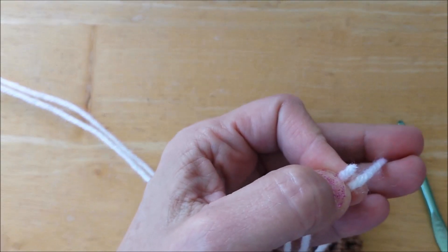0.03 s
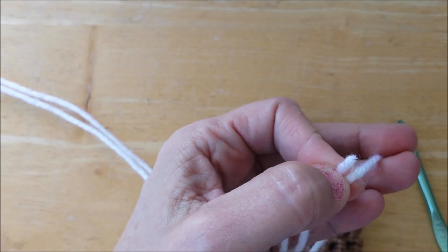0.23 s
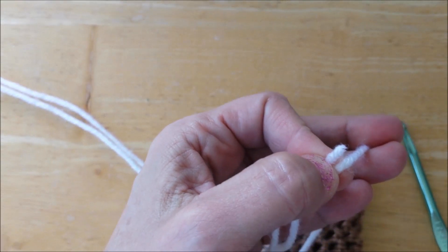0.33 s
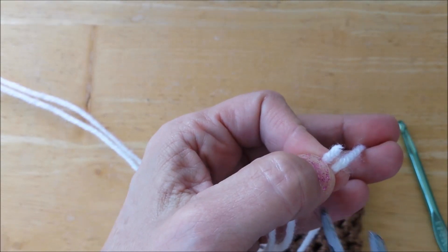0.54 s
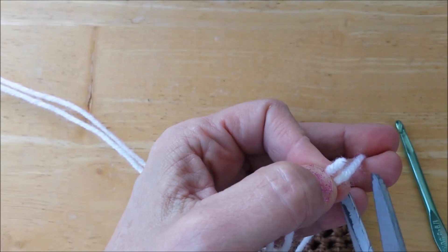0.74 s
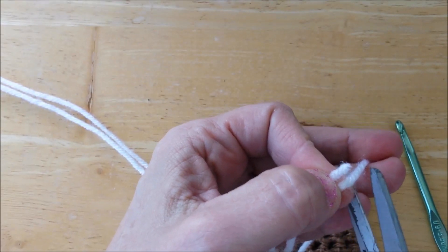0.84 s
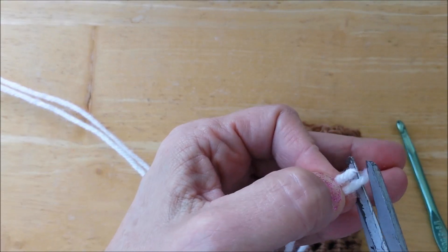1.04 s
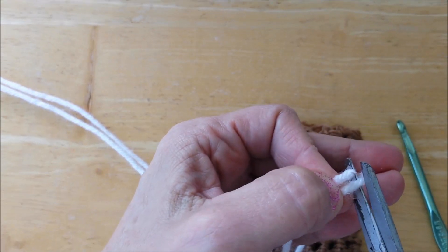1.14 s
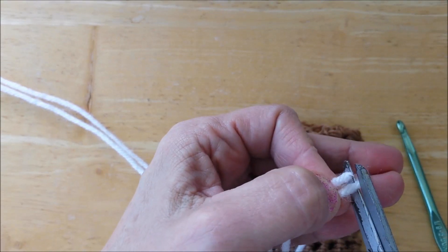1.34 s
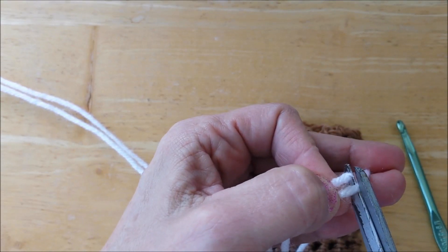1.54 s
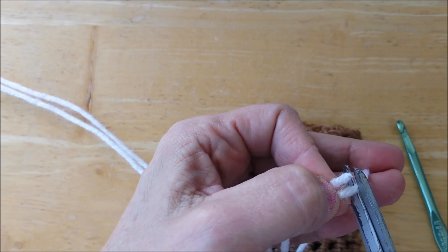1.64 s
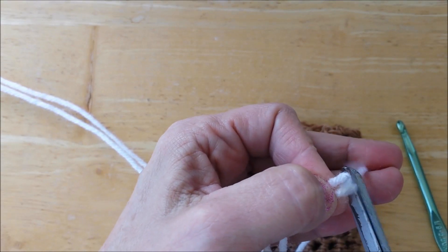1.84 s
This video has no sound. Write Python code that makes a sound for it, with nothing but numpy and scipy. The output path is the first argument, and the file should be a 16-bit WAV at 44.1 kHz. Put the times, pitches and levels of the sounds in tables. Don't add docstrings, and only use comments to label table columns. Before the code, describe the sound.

Scissors clack once against a wooden table near the start, then the blades tick and scrape open with a crisp metallic release; later only faint ticks and a soft snip, close stereo microphone in a small quiet room.

```python
import sys
import numpy as np
from scipy import signal
from scipy.fft import rfft, irfft
from scipy.io import wavfile
from scipy.ndimage import uniform_filter1d

SR = 44100
rng = np.random.default_rng(int(sys.argv[2]) if len(sys.argv) > 2 else 0)


def log_audio(samples):
    frames = np.atleast_2d(samples).T
    limited = np.clip(frames, -1, 1)
    pcm = np.round(limited * 32767).astype(np.int16)
    wavfile.write(sys.argv[1], SR, pcm)


def voltage_ratio(level):
    return 10 ** (np.asarray(level, float) / 20)


N = 83790
T = np.arange(N) / SR
F = np.maximum(np.arange(N // 2 + 1) * SR / N, 1)


def read(table, hz):
    table = np.array(table)
    return np.interp(np.log(hz), np.log(table[:, 0]), table[:, 1])


def unit(x):
    return x / np.sqrt(np.sum(x ** 2) / len(np.atleast_2d(x)))


def ring(x, hz, width):
    b, a = signal.iirpeak(min(hz, .45 * SR), hz / width, fs=SR)
    return signal.lfilter(b, a, x)


def resonate(x, table):
    total = 0
    for k, (hz, width, db) in enumerate(table):
        mode = ring(ring(x, hz, 1.17 * width), hz, 1.17 * width)
        total = total + (-1) ** k * voltage_ratio(db) * unit(mode)
    return unit(total)


def pan(db):
    return voltage_ratio(np.array([[db / 2], [-db / 2]]))


def bump(at, rise, fall):
    return np.exp(np.where(T < at, (T - at) / rise, (at - T) / fall))


def walk(rate):
    hold = int(SR / rate)
    steps = np.repeat(rng.standard_normal(N // hold + 1), hold)
    return 1.84 * uniform_filter1d(uniform_filter1d(steps, hold), hold)[:N]


# pitch_hz, coherence
COHERENCE = [(30, 1), (100, 0.85), (300, 0.92), (700, 0.46), (1500, 0.077), (4000, 0.0167)]
# pitch_hz, balance_db
FIELD_BALANCE = [(30, 10), (70, 4.5), (200, 0), (1000, 1.5), (5000, -1.5), (14000, -8.5)]


def diffuse_field(gain):
    alike = np.clip(read(COHERENCE, F), 0, 1)
    mid, side = rfft(rng.standard_normal((2, N)))
    mid = mid * np.sqrt(1 + alike)
    side = side * np.sqrt(1 - alike)
    lean = voltage_ratio(read(FIELD_BALANCE, F) / 2)
    return irfft(gain * np.array([(mid + side) * lean, (mid - side) / lean]) / 2, N)


# pitch_hz, t60_s
ROOM_DECAY = [(125, 0.44), (500, 0.4), (2000, 0.3665), (5000, 0.3523), (9000, 0.28), (15000, 0.41)]


def room(x, early_db):
    early_t60_s, gap_s = 0.1025, 0.0066
    t = T[:SR // 2]
    tail = 0
    for hz in 62.5 * 2 ** np.arange(0, 8.1, .5):
        band = diffuse_field(np.exp(-(np.log2(F / hz) / .3) ** 2))[:, :len(t)]
        tail = tail + band * voltage_ratio(-60 * t / read(ROOM_DECAY, hz))
    early = 1 + voltage_ratio(early_db - 60 * t / early_t60_s)
    tail = unit(tail * early * (1 - np.exp(-t / gap_s)))
    return signal.fftconvolve(x[None], tail, axes=1)[:, :N]


# pitch_hz, density_db_per_hz
NOISE_COLOUR = [(40, -35), (85, -5.5), (280, -9), (560, -16.5), (1500, -25), (5900, -31), (10500, -27.5),
                (16000, -33.5)]
# pitch_hz, width_hz, level_db
HUM_BANDS = [(52, 14, -70), (98.3, 34, -64), (111, 39, -70.5), (176.8, 25, -70.5), (283.5, 45, -65.5),
             (356.8, 54, -66), (411.7, 91.5, -73)]
# time_s, level_db
RUMBLE_SWELL = [(0.0, -61), (0.152, -59.5), (0.402, -59.5), (0.582, -58), (0.798, -60.5), (1.18, -60.5),
                (1.434, -62.5), (1.692, -63), (1.9, -58)]


def floor():
    noise_db, swell_ref_db, whine_db = -58, -60.5, -78.5
    rumble_top_hz, bottom_hz, whine_hz = 2160, 42, 9920
    low = 1 / (1 + (F / rumble_top_hz) ** 2)
    colour = voltage_ratio(read(NOISE_COLOUR, F)) / (1 + (bottom_hz / F) ** 2)
    rumble = diffuse_field(colour * np.sqrt(low))
    hiss = diffuse_field(colour * np.sqrt(1 - low))
    gain = voltage_ratio(noise_db - 3) / (rumble + hiss).std()
    rumble = rumble * gain
    for hz, width, db in HUM_BANDS:
        band = diffuse_field(1 / (1 + ((F - hz) / (width / 2)) ** 2))
        rumble = rumble + band / band.std() * voltage_ratio(db + 1.36 * walk(4.163))
    swell = voltage_ratio(np.interp(T, *np.array(RUMBLE_SWELL).T) - swell_ref_db)
    whine = voltage_ratio(whine_db + 2.0 * walk(10)) * np.sin(2 * np.pi * whine_hz * T)
    return rumble * swell + hiss * gain + whine


def rub():
    at_s, length_s, level_db, pitch_hz = .158, .02, -62, 725
    push = rng.standard_normal(N) * np.exp(-((T - at_s) / length_s) ** 2)
    return voltage_ratio(level_db) * 30 * resonate(push, [(pitch_hz, 50, 0)])


# start_s, level_db, pitch_hz, length_s, room_share_db
BLADE_TICKS = [(0.1949, -42.5, 7700, 0.004, -2), (0.1984, -55, 7000, .002, -17.5),
               (.2236, -33, 6540, 0.0033, -12), (0.399, -41.5, 8020, 0.00148, -6.5),
               (1.4674, -41, 8900, .003, -3), (1.4706, -50.5, 9400, 0.0023, -9),
               (1.757, -53.5, 9600, 0.023, 0), (1.787, -57.5, 9600, .015, -6),
               (1.876, -50, 15000, 0.0083, -3), (1.8797, -49.5, 9360, 0.0051, 0),
               (1.880, -53.5, 2940, 0.012, -1.5), (1.888, -57.5, 8000, 0.0042, 0)]
# end_s, level_db, build_up_s, release_s
BLADE_SCRAPES = [
    (.508, -51, 0.051, 0.0035),
    (0.5172, -45, 0.00174, 0.0044),
    (0.522, -33.5, 0.0015, 0.0015),
    (1.88, -53.5, 0.0024, .004),
]
# pitch_hz, width_hz, level_db
BLADE_MODES = [(1280, 550, -20), (3070, 690, -7), (3870, 1220, -17), (5120, 650, -4), (7120, 980, 0.5),
               (8800, 1500, -1.5), (9630, 1510, -2.5), (11800, 2130, -11.5), (15000, 2500, -11)]
# time_s, balance_db
HAND_PATH = [(.2, 9.5), (.5, 11.5), (1.47, 8.5), (1.9, 7)]


def blades():
    tick_q, tick_air_db = 5.2, -12.5
    lead_db, lead_s = -14, 0.0061
    early_db, room_db = 10.5, 1.5
    dry, send = np.zeros((2, N)), 0

    def side(at):
        return pan(np.interp(at, *np.array(HAND_PATH).T))

    for at, db, hz, length, wet_db in BLADE_TICKS:
        push = np.sign(rng.standard_normal(N)) * bump(at, 0.051 * length, 0.323 * length)
        air = resonate(push, [(4000, 3000, -6), (11370, 5000, -12), (14200, 3900, 0)])
        steel = resonate(push, [(hz, hz / tick_q, 0)])
        tick = voltage_ratio(db) * 4 * (steel + voltage_ratio(tick_air_db) * air)
        dry = dry + tick * side(at)
        send = send + voltage_ratio(wet_db) * tick
    for at, db, rise, fall in BLADE_SCRAPES:
        shape = bump(at, rise, fall) + voltage_ratio(lead_db) * bump(at, lead_s, .003)
        push = np.sign(rng.standard_normal(N)) * voltage_ratio(2.0 * walk(1500)) * shape
        scrape = voltage_ratio(db) * 6 * resonate(push, BLADE_MODES)
        dry = dry + scrape * side(at)
        send = send + scrape
    return dry + voltage_ratio(room_db) * room(send, early_db) * pan(6.2)


# pitch_hz, level_db, t60_s, swell_s
KNOCK_MODES = [(85.4, -12, 0.48, 0.075), (151, -24.5, 0.51, 0.0166), (196, -11.5, .33, 0.0097),
               (246.7, 6, 0.26, 0.0392), (400.6, -13.5, 0.33, 0.0055), (535, -13.5, 0.3, 0.0021),
               (724.4, -13, 0.26, 0.00224), (1292, -11.5, 0.33, 0.0036), (1505, -9, 0.156, .002),
               (1605, -13.5, 0.25, 0.0022), (1723, -10.5, .15, 0.0018), (2268.6, -3.5, .15, 0.0012),
               (3580, -7, 0.22, 0.029), (3690, -12, .2, .01)]
# pitch_hz, width_hz, level_db
CRACK_COLOUR = [(695, 890, -6), (1560, 670, -5.5), (2300, 450, -16), (4050, 1330, 0.5), (6120, 860, -2),
                (7700, 550, -7), (9600, 1200, -6.5), (12700, 5000, -20.5)]
# pitch_hz, width_hz, level_db
ECHO_COLOUR = [(332, 190, -8.5), (560, 260, -5), (945, 310, -5.5), (1396, 480, 0.5), (2377, 320, -0.5),
               (3023, 270, -7.5), (3660, 530, -5), (4520, 710, -6.5), (6420, 1435, -2), (9000, 2500, -6.5),
               (10640, 3500, -13), (13930, 2700, -24.5)]
# pitch_hz, balance_db
KNOCK_BALANCE = [(60, -7), (110, 13.5), (200, 2.5), (380, 0), (700, 0), (1290, -1.5), (2380, 2.5),
                 (4400, 3), (8120, 12.5), (15000, -0.5)]


def knock():
    at_s, crack_db, thud_db, modes_db, echo_db = .2081, -15.5, -15.5, -23, 5
    t = np.maximum(T - at_s, 0)
    push = np.sign(rng.standard_normal((2, N))) * (1 - np.exp(-t / 0.000129)) * np.exp(-t / 0.00139)
    push[1] = .6 * push[0] + 0.66 * push[1]
    crack = unit(resonate(push, CRACK_COLOUR)) * voltage_ratio(crack_db) * 4
    thud = -voltage_ratio(thud_db) * np.sin(2 * np.pi * 620 * t) * np.exp(-t / 0.0011)
    impulse = 1. * (np.arange(N) == int(at_s * SR))
    echo = room(unit(resonate(impulse, ECHO_COLOUR)), 0.5) * voltage_ratio(crack_db + echo_db) * 4
    modes = 0
    for hz, db, t60, swell in KNOCK_MODES:
        phase, sign = rng.uniform(0, 2 * np.pi), rng.choice([-1, 1])
        turn = np.array([[0], [sign * min((hz / 800) ** 1.37, 1.9)]])
        flutter = voltage_ratio(min(hz / 400, 4.0) * walk(112.56))
        envelope = voltage_ratio(db - 60 * t / t60) * (1 - np.exp(-t / swell)) * flutter
        modes = modes + envelope * np.sin(2 * np.pi * hz * t + phase + turn)
    lean = voltage_ratio(read(KNOCK_BALANCE, F) / 2)
    whole = crack + thud + voltage_ratio(modes_db) * modes + echo
    return irfft(rfft(whole) * np.array([lean, 1 / lean]), N)


def scene():
    return floor() + rub() + blades() + knock()


def band_limit(x):
    return signal.sosfilt(signal.butter(12, 16490, fs=SR, output="sos"), x)


def record(dry):
    low_hz, top_hz, offset = 55, 15800, -.0002
    x = signal.sosfilt(signal.butter(2, low_hz, "high", fs=SR, output="sos"), dry)
    x = signal.sosfilt(signal.ellip(10, .3, 45, top_hz, fs=SR, output="sos"), x)
    return band_limit(x + offset)


dry = scene()
out = record(dry)
log_audio(out)
```